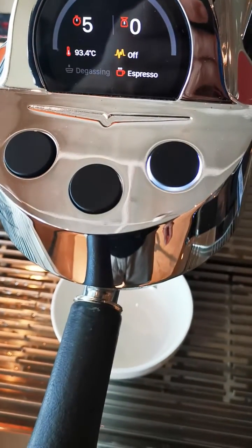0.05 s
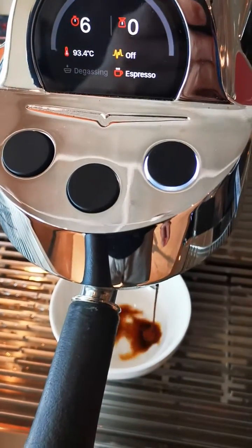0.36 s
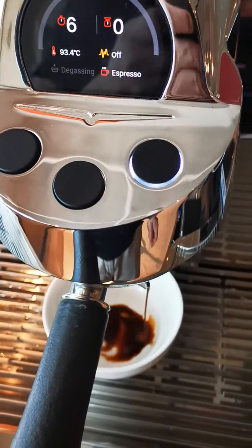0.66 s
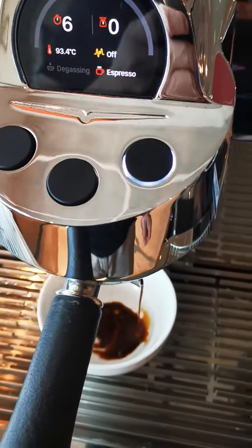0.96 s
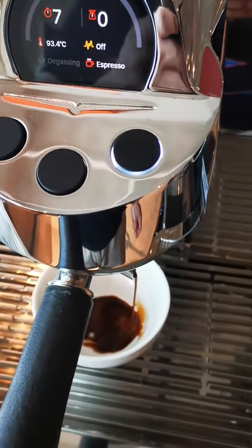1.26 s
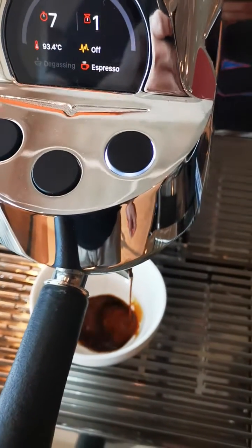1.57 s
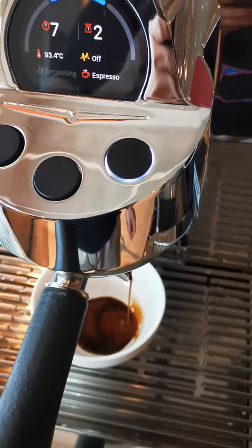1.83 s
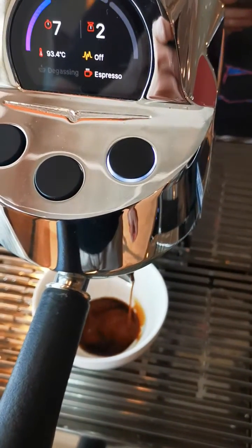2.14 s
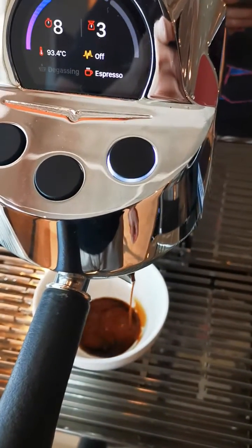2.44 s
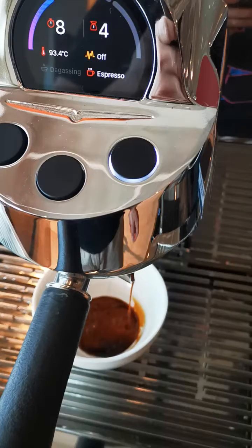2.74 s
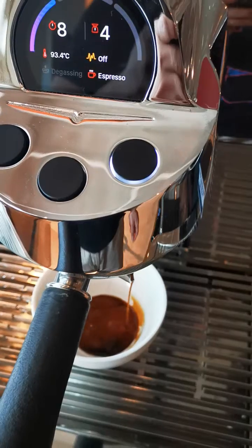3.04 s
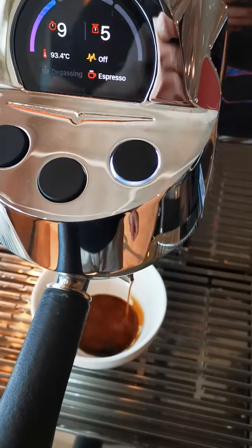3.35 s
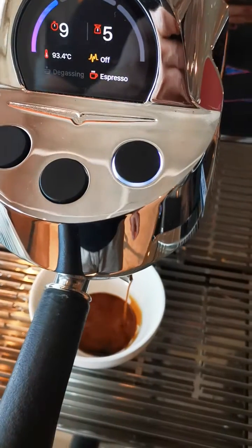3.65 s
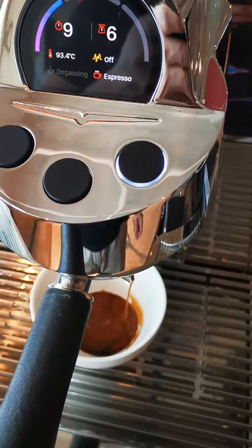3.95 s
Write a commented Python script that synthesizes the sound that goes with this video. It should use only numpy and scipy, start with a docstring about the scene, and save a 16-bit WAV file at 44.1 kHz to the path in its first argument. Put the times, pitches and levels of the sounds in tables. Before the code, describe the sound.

Espresso drips and trickles into a china cup, starting about a second in, with tiny bubbly plinks and a faint fizz. The machine's pump hums steadily underneath, heard close up in a quiet room.

```python
"""A rotary pump hums over a soft rush, close by in a quiet room. After a second, espresso trickles
from the portafilter into a china cup. The stream traps tiny bubbles in the pool, and their plinks fall
in pitch as the cup fills and the crema thickens. Droplets tick, the crema fizzes, and each plink
bounces off the cup's wall and the underside of the machine."""
import sys
import numpy as np
from scipy import signal
from scipy.fft import rfft, irfft
from scipy.io import wavfile
from scipy.ndimage import uniform_filter1d

SR = 44100
rng = np.random.default_rng(int(sys.argv[2]) if len(sys.argv) > 2 else 0)


def output_pcm(signal):
    """Save a mono or channel-first signal as 16-bit PCM at the path in sys.argv[1].

    Samples are clipped to [-1, 1] before scaling.
    """
    pcm = np.clip(np.atleast_2d(signal).T, -1, 1) * 32767
    wavfile.write(sys.argv[1], SR, np.round(pcm).astype(np.int16))


N = 176400

BUBBLE_TRIM_DB, SPLASH_TRIM_DB, SPLASH_DECAY_S = -2, 9.5, .0023
# EQ of splashes and fizz: f/Hz, gain/dB
SPLASH_EQ = [(1200, -34), (2600, -14), (3900, 4), (5200, 10.5), (6400, -1), (8000, 1), (10000, -17.5),
             (15000, -29)]
# Plink cues, levels before trim and EQ: t/s, level/dB, starting f/Hz, left-right/dB, splash level/dB
PLINK_CUES = [(1.082, -23.5, 3660, 1, -43), (1.1677, -20.5, 4430, 0, -38), (1.2256, -37, 4440, 0, -46),
              (1.2428, -30.5, 5060, 4, -44), (1.286, -19, 4150, -0.5, -38), (1.3323, -25.5, 4250, -3, -41),
              (1.3801, -41.5, 3620, 1.5, -45), (1.4346, -37.5, 4800, 1.5, -50),
              (1.544, -35.5, 3400, 3, -43.5), (1.6589, -30.5, 4100, 1.5, -45),
              (1.6763, -31.5, 3780, 4, -44), (1.7007, -31, 5140, -4, -39), (1.7476, -22, 4620, 2.5, -35.5),
              (1.7676, -30, 4100, -1.5, -46), (1.773, -31, 3170, -1.0, -51), (1.8068, -25.5, 3070, 6, -48),
              (1.8136, -33, 3020, -2, -57), (1.8312, -35, 3070, 2.5, -52), (1.8784, -35, 4200, 0.5, -43),
              (1.8854, -37, 3230, 2.0, -47), (1.9087, -33, 3270, -0.5, -48), (1.925, -33, 3330, -2, -52),
              (1.944, -40, 3290, 2.0, -46), (2.1196, -39, 3040, 4, -45), (2.148, -31.5, 6700, 15, -51),
              (2.23, -29, 2680, -5.0, -55), (2.249, -35, 2770, -4, -42), (2.2712, -25, 2620, -4, -48),
              (2.2838, -31, 2580, -8, -55), (2.3076, -32.5, 3170, 2, -46), (2.3338, -26.5, 2580, -5, -37.5),
              (2.3751, -32, 2770, 1, -41.5), (2.396, -22, 2600, -8, -47), (2.4157, -28.5, 2520, -6, -51),
              (2.4543, -36, 2040, -6, -48), (2.584, -36, 3230, 0.0, -50), (2.63, -29.5, 2540, -6, -53),
              (2.6465, -27.5, 2670, -1, -54), (2.7186, -34, 3060, 1.0, -41.5),
              (2.7412, -38, 2570, 0.0, -41), (2.7541, -21, 2680, -3.5, -37), (2.812, -36, 2550, -7, -50.5),
              (2.8767, -37, 2600, -6, -49), (3.041, -27.5, 2540, -5, -46), (3.0963, -38.5, 1870, 0.5, -48),
              (3.112, -29, 2040, -9, -47), (3.17, -46, 2570, -2, -48), (3.241, -37, 2600, -6, -51),
              (3.2585, -34, 2500, -8, -57), (3.2816, -28, 2210, -9, -59), (3.3612, -30, 1880, -5, -54),
              (3.4035, -34, 2380, -6, -64), (3.5308, -29, 2430, -9, -53), (3.549, -36, 2640, -6, -57),
              (3.5718, -36, 2600, -3.5, -48), (3.585, -32, 2400, -14, -55), (3.6262, -28.5, 2220, -11, -49),
              (3.6852, -31, 2550, -2.5, -46), (3.8606, -31.5, 2350, -6, -52),
              (3.9091, -29.5, 1870, -9, -55), (3.9177, -33.5, 1840, -7, -55), (3.939, -31, 2380, -13, -52),
              (3.957, -32, 1990, -9, -56), (3.9809, -30, 2210, -11, -56)]


def plinks():
    """Up front: each drop splashes into the pool and traps a bubble that rings clearly."""
    rings, spatter = np.zeros((2, 2, N))
    for cue_s, db, hz, pan, splash_db in PLINK_CUES:
        start = cue_s + .0008  # each splash and its plink sound together, just after the cue time
        add(rings, start, undb(db + BUBBLE_TRIM_DB) * sides(pan) * bubble(start, hz))
        add(spatter, start, undb(splash_db + SPLASH_TRIM_DB) * splash(SPLASH_DECAY_S))
    return rings + colour(spatter, *np.array(SPLASH_EQ).T)


def bubble(start, hz, clear_cycles=.92, crema_cycles=.63, rise_per_s=11.5):
    """Trapped air rings for a few cycles, bending upward; thickening crema damps it sooner."""
    t = np.arange(700) / SR
    decay = np.interp(start, [1, N / SR], [clear_cycles, crema_cycles]) / hz

    def ring(age):
        envelope = (age / decay / 2) ** 2 * np.exp(2 - age / decay)
        return envelope * np.sin(2 * np.pi * hz * age * (1 + rise_per_s * age / 2))

    wall = echoes(decay_s=.0014, delay_s=.0006, size=500)
    cup_echo = signal.fftconvolve(wall, ring(t)[None], axes=1)[:, :len(t)]
    underside_delay_s = np.array([[.001173], [.001223]])  # later on the right
    machine_echo = ring(np.maximum(t - underside_delay_s, 0))
    return ring(t) + undb(-1) * cup_echo + undb(-13.5) * machine_echo


def splash(decay_s):
    """A spatter of liquid: a noise burst with a hard attack."""
    t = np.arange(400) / SR
    return rng.standard_normal((2, len(t))) * np.exp(-t / decay_s) / 2


# Bright EQ of the ticks: f/Hz, gain/dB
TICK_EQ = [(1200, -22), (3000, -18), (5500, 9), (7300, 11), (8000, 4), (9000, 5), (10500, -4), (15000, -13)]
# Tick cues, level before trim and EQ: t/s, level/dB
TICK_CUES = [(1.0306, -41), (1.1383, -37.5), (1.1832, -39), (1.1967, -36), (1.2426, -38.5), (1.7005, -34),
             (1.9644, -39.5), (2.148, -44), (2.4508, -38.5), (2.5825, -42), (2.6459, -42), (2.7197, -39),
             (2.8449, -34), (3.041, -40), (3.0954, -43), (3.1712, -42), (3.2819, -39.5), (3.3613, -43.5),
             (3.7733, -42), (3.8606, -37)]


def droplet_ticks(trim_db=3.5, lag_s=.0012):
    """Droplets land with a short, crisp tick."""
    ticks = np.zeros((2, N))
    for start, db in TICK_CUES:
        add(ticks, start + lag_s, undb(db + trim_db) * splash(decay_s=.001))
    return colour(ticks, *np.array(TICK_EQ).T)


# Trickle automation: t/s, typical bubble f/Hz, bubble level/dB, spray level before EQ/dB
TRICKLE_CURVES = [(0.9, 4300, -68, -68), (1.15, 4260, -52, -56), (1.55, 3730, -55, -60),
                  (1.85, 3180, -46, -45.5), (2.1, 3000, -50.5, -48), (2.35, 2850, -44.5, -46),
                  (2.9, 2550, -47, -53), (3.3, 2400, -47, -54), (4.0, 2250, -44, -54)]


def trickle(bubbles_per_s=110, fizz_per_s=90):
    """The thin stream stirs the air in the cup and sheds faint bubbles; spray and bursting crema fizz."""
    times, pitch, level, spray = np.array(TRICKLE_CURVES).T
    rings, fizz = np.zeros((2, 2, N))
    air_db = np.interp(np.arange(N) / SR, times, level) - 13.5
    cup_air = resonance(hz=1142, width_hz=230) * undb(air_db)
    pour_s = N / SR - 1
    for start in rng.uniform(1, N / SR, int(pour_s * bubbles_per_s)):
        accent, detune, pan = np.clip(rng.standard_normal(3), -2, 2)
        hz = np.interp(start, times, pitch) * np.exp(.098 * detune)
        db = np.interp(start, times, level) + 3 * accent
        add(rings, start, undb(db) * sides(2 * pan - 1) * bubble(start, hz))
    for start in rng.uniform(1, N / SR, int(pour_s * fizz_per_s)):
        db = np.interp(start, times, spray) + 6 * rng.standard_normal()
        add(fizz, start, undb(db) * splash(SPLASH_DECAY_S))
    return rings + cup_air + colour(fizz, *np.array(SPLASH_EQ).T)


# Pump partials, keyed by multiple of the shaft rate: RMS level before trim/dB, left-right/dB
PUMP_PARTIALS = {8: (-62, 2), 12: (-60, -1), 16: (-51.5, -2), 17: (-67, -3), 19: (-70, -4), 20: (-63, -4),
                 21: (-71, -1), 22: (-71, -8), 24: (-56.5, 9), 28: (-67, -5), 30: (-72, 5), 34: (-72, -4),
                 36: (-71, 4), 45: (-68, 4), 46: (-70, 12), 47: (-72, -2), 48: (-68, -3), 49: (-72, 13),
                 51: (-70, 9), 52: (-69, -7), 60: (-68.5, 7), 64: (-70, 2), 68: (-66, 3), 72: (-67, 6),
                 80: (-70, -3), 84: (-73, -1), 96: (-70, 8), 104: (-72, 12)}


def pump(shaft_hz=23.735, speed_drift=.00048, trim_db=1, in_phase_below_hz=380):
    """The rotary pump drones on harmonics of its shaft; higher ones flutter more and spread wider."""
    shaft_angle = 2 * np.pi * np.cumsum(shaft_hz * (1 + speed_drift * walk(1.48))) / SR
    drone = np.zeros((2, N))
    for multiple, (db, pan) in PUMP_PARTIALS.items():
        hz = multiple * shaft_hz
        phase = multiple * shaft_angle + rng.uniform(0, 2 * np.pi)
        spread_rad = 1.97 * np.clip(hz / in_phase_below_hz - 1, 0, 1) * rng.choice([-1, 1])
        flutter = 1 + (.091 + .13 * hz / 1000) * walk(24)
        drone += undb(db + trim_db) * sides(pan) * flutter * np.sin([phase, phase + spread_rad])
    return np.sqrt(2) * drone


def motor(hz=48.13, rms_db=-47.5):
    """The motor lays a low, wavering hum under the pump."""
    t = np.arange(N) / SR
    waver = 1 + .11 * walk(12)
    return np.sqrt(2) * undb(rms_db) * sides(.62) * waver * np.sin(2 * np.pi * hz * t)


def water_flow(start_db=-58, fade_db_per_s=4):
    """Water rushes through the group head, quieter as pressure builds."""
    return resonance(hz=610, width_hz=200) * undb(start_db - fade_db_per_s * np.arange(N) / SR)


# Noise bed, levels in a 1 Hz band: f/Hz, mid level/dB, side level/dB
BED_SPECTRUM = [(14, -74, -70), (65, -75, -91), (85, -80, -114), (109, -69, -92.5), (148, -75.5, -92),
                (205, -73.5, -88), (236, -78.5, -94), (390, -80.5, -83.5), (480, -79.5, -81),
                (690, -84, -83.5), (975, -88.5, -86.5), (1160, -89.5, -91.5), (1440, -93, -86),
                (1770, -90, -96), (2240, -91.5, -92.5), (3040, -96.5, -96), (4080, -99, -99),
                (4950, -102, -103), (6300, -100, -102), (7680, -98, -95.5), (7830, -94, -92.5),
                (8280, -100, -99), (9300, -104, -104), (10280, -114, -114), (14900, -116, -116)]


def noise_bed():
    """The steady rush of machine and room, centred in the bass and wide above."""
    hz, mid_db, side_db = np.array(BED_SPECTRUM).T
    mid, side = rng.standard_normal((2, N)) * np.sqrt(SR / 2)
    return colour(mid, hz, mid_db) + colour(side, hz, side_db) * np.array([[1], [-1]])


def undb(db):
    """Decibels to gain."""
    return 10 ** (np.asarray(db) / 20)


def sides(db):
    """Constant-power pan gains for a left-right level difference."""
    gains = undb(np.array([[db], [-db]]) / 2)
    return gains / np.sqrt(np.mean(gains ** 2))


def colour(x, hz, db):
    """EQ by a curve of dB over log frequency."""
    f = np.maximum(np.fft.rfftfreq(N, 1 / SR), 1)
    return irfft(rfft(x) * undb(np.interp(np.log(f), np.log(hz), db)), N)


def walk(rate_hz):
    """Smooth random modulation with a spread near 1."""
    hold = int(SR / rate_hz)
    steps = np.repeat(rng.standard_normal(N // hold + 1), hold)
    return 1.3 * uniform_filter1d(steps, hold)[:N]


def add(track, start, sound):
    """Drop a short stereo sound onto a track at a time in seconds."""
    i = int(np.clip(start * SR, 0, N - 1))
    track[:, i:i + sound.shape[1]] += sound[:, :N - i]


def echoes(decay_s, delay_s, size):
    """Dense fading reflections of unit energy, different on each side."""
    t = np.arange(size) / SR
    tail = rng.standard_normal((2, size)) * np.exp(-t / decay_s) * (t > delay_s)
    return tail / np.sqrt(np.sum(tail ** 2, axis=1, keepdims=True))


def resonance(hz, width_hz):
    """Noise rung twice through one resonant peak, at unit level."""
    b, a = signal.iirpeak(hz, hz / width_hz, fs=SR)
    band = signal.lfilter(b, a, signal.lfilter(b, a, rng.standard_normal((2, N))))
    return band / band.std()


def scene(reverb_db=-17.5):
    """Coffee in the cup with a touch of room, over the running machine."""
    background = pump() + motor() + noise_bed() + water_flow()
    room = echoes(decay_s=.05, delay_s=.001, size=10000)
    coffee = plinks() + droplet_ticks() + trickle()
    reverb = signal.fftconvolve(coffee, room, axes=1)[:, :N]
    return coffee + undb(reverb_db) * reverb + background


# Treble tilt between the microphones: f/Hz, left-right/dB
MIC_TILT = [(9000, 0), (12000, 3)]


def record(dry, low_cut_hz=12, high_cut_hz=15300):
    """A microphone pair, brighter on the left, with a rumble filter and a steep high cut."""
    hz, db = np.array(MIC_TILT).T
    mics = np.array([colour(dry[0], hz, db / 2), colour(dry[1], hz, -db / 2)])
    mics = signal.sosfilt(signal.butter(2, low_cut_hz, "hp", fs=SR, output="sos"), mics)
    return signal.sosfilt(signal.ellip(10, .2, 70, high_cut_hz, fs=SR, output="sos"), mics)


dry = scene()
out = record(dry)
output_pcm(out)
```